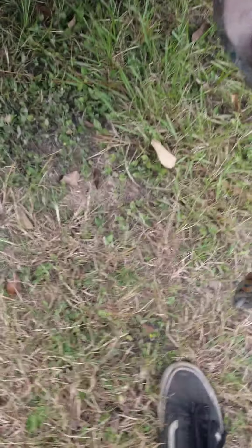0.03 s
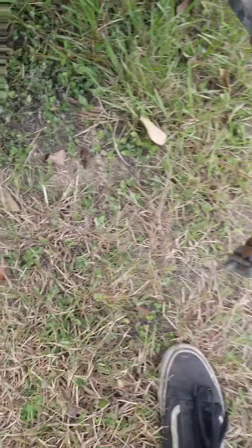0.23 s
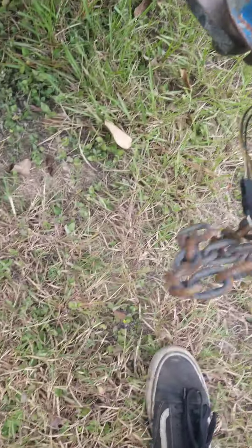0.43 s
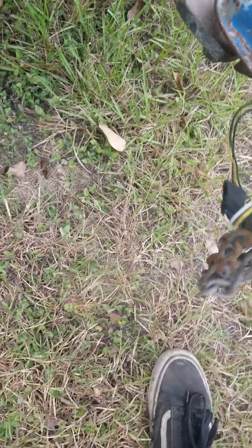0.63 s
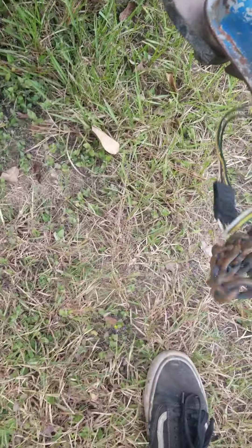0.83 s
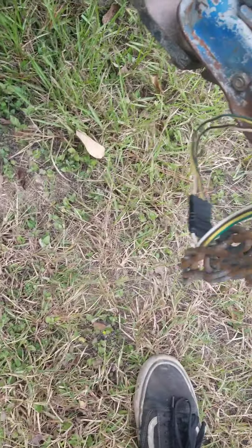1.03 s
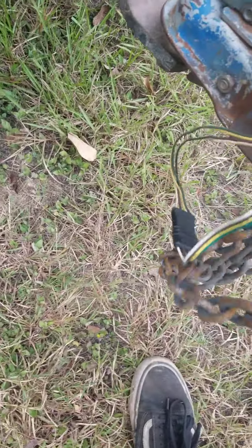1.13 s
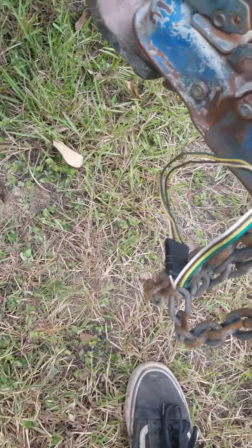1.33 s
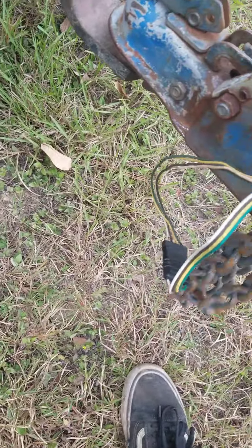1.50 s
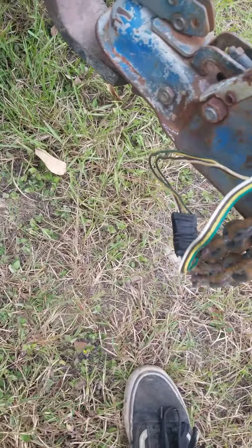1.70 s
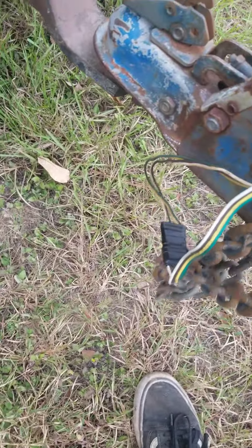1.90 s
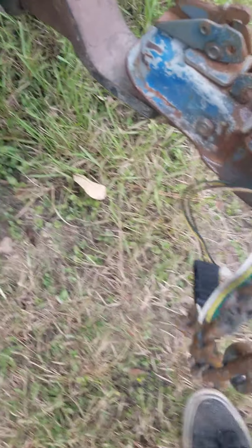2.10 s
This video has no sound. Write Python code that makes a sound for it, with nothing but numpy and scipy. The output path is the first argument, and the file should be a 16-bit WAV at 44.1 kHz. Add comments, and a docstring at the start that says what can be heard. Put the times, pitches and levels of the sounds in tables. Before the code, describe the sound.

A rusty steel chain clinks and rattles close by, knocking against a trailer hitch outdoors.

```python
"""High ticks and rings of a rusty steel chain, handled close by at a trailer hitch, outdoors over grass.
Links tick and ring as they collide, and scrape as they slide. Heavier steel parts clack and ring
the hitch; moving the chain gives two soft thumps. Behind it: faint wind rumble, low hum, airy hiss."""
import sys
import numpy as np
from scipy import signal
from scipy.fft import rfft, irfft, next_fast_len
from scipy.io import wavfile
from scipy.ndimage import map_coordinates

SR = 44100
rng = np.random.default_rng(int(sys.argv[2]) if len(sys.argv) > 2 else 0)


def transcribe(u):
    """Save the signal u as a 16-bit wav file named by the first command-line argument.

    u: samples, shape (n,) or (channels, n), limited to [-1, 1]; the rate is SR.
    q: integer samples, one column per channel.
    """
    v = np.clip(np.atleast_2d(u).T, -1, 1)
    q = np.round(v * 32767).astype(np.int16)
    wavfile.write(sys.argv[1], SR, q)


N = 94815
T = np.arange(SR // 2) / SR  # time within one event, s

# Table levels are relative, ahead of each layer's gain.
# link striking link: start_s, tick_db, ring_db
LINK_HITS = [(0.142, -40.5, -36), (.163, -40, -35), (.2319, -26.5, -8.5), (0.251, -20.5, -7),
             (0.2754, -27.5, -8), (0.3596, -27.5, -3.5), (0.4184, -17.5, -29), (.458, -30, -9.5),
             (.523, -26.5, -5), (.538, -26, -16.5), (0.5533, -29, -6.5), (0.564, -23, -1), (.58, -28, -9.5),
             (0.608, -21, -3.5), (.616, -34, -13), (.63, -23.5, -5.5), (.647, -24.5, -2.5),
             (0.663, -42.5, -5), (0.694, -38, -9.5), (0.7301, -36.5, -9), (.739, -35.5, -15),
             (0.7849, -33.5, -17), (0.794, -33.5, -25.5), (.832, -36, -20.5), (0.9051, -30, -4.5),
             (.921, -29, -4), (0.948, -40.5, -20), (.951, -27, -2), (0.966, -34, -6.5), (0.984, -41, -29),
             (.996, -43, -19), (1.015, -35, -12), (1.069, -47, -24.5), (1.094, -41.5, -41),
             (1.1438, -41.5, -24), (1.1793, -41, -34), (1.2404, -43, -41.5), (1.326, -44, -49),
             (1.415, -49, -41), (1.5232, -43, -51.5), (1.5437, -34.5, -43), (1.898, -43, -22),
             (1.949, -48.5, -31), (2.0493, -44.5, -31)]
# free ringing of the links: pitch_hz, level_db
LINK_RING_MODES = [(13322, 3), (13450, 1.5), (13730, 2), (13930, -6), (14291, 5.5), (14517, -1),
                   (14735, -13), (15100, -7.5)]
# links ring longer when the chain hangs slack: time_s, t60_s
LINK_DECAY = [(.26, 0.023), (.52, 0.039), (.63, 0.097), (1.2, 0.052)]
# single modes left by a clean strike: start_s, pitch_hz, level_db, t60_s
LINK_PINGS = [(.006, 2670, -33, .09), (0.145, 9125, -50, 0.2), (.36, 12200, -14, 0.044),
              (0.363, 11740, -21, 0.074), (0.418, 6360, -13, 0.02), (.419, 4410, -31.5, 0.052),
              (0.61, 14200, -16.5, 0.23), (.696, 13322, -13, 0.13), (0.758, 9125, -41, 0.048),
              (0.904, 12160, -15, 0.062), (.955, 11700, -17.5, 0.052), (1.094, 12060, -26, 0.036),
              (1.726, 3600, -48, .1), (1.956, 3470, -46, 0.11)]
# link contact spectrum: freq_hz, level_db
TICK_SPECTRUM = [(200, -43), (900, -20), (1800, -7), (3200, -1.5), (5500, -1), (7000, 1), (8500, -11),
                 (10500, 1), (13000, 2), (15000, 1.5), (16200, -10)]
# rusty links sliding: time_s, level_db
SCRAPE_LEVEL = [(.13, -57), (.17, -47), (.2, -51), (.33, -45.5), (.58, -35.5), (.7, -45), (.82, -39.5),
                (.86, -55.5), (.98, -34), (1.05, -63.5), (1.51, -60), (1.565, -35), (1.6, -64),
                (1.73, -53.5), (1.78, -73), (2.03, -59.5), (2.13, -46)]
# heavy steel knocking on the hitch: start_s, level_db, t60_s, body_offset_db
HITCH_CLACKS = [(.006, -32.5, 0.096, 9.5), (0.0877, -10.5, 0.035, -18), (.248, -4, 0.018, -1),
                (0.251, -26.5, 0.1, 19), (.35, -18, 0.036, 7), (0.42, -22, 0.17, 9), (.458, -21, 0.083, 6),
                (.505, -27.5, 0.17, 6.5), (.667, -10, 0.048, 0.5), (0.806, -22, 0.042, 0.5),
                (1.617, -13.5, 0.053, 1), (1.726, -30, 0.1, -2), (1.956, -37, 0.12, 2.5)]
# clack spectrum, stereo mid: freq_hz, level_db
CLACK_MID_SPECTRUM = [(200, -51), (1000, -22.5), (2200, -15.5), (2800, -2.5), (3600, -4.5), (4600, -8.5),
                      (6000, -20.5), (9000, -38)]
# clack spectrum, stereo side: freq_hz, level_db
CLACK_SIDE_SPECTRUM = [(900, -46.5), (2200, -19.5), (2550, 9), (3000, -4.5), (3800, -6.5), (4600, -9.5),
                       (6000, -21), (9000, -38)]
# hitch body response: freq_hz, level_db
BODY_SPECTRUM = [(200, -18), (1000, -7.5), (1500, 1), (1980, 9), (2300, -6.5), (5000, -48)]
# hitch steel rung by each clack: pitch_hz, level_db, t60_s
CLACK_MODES = [(1463, -29.5, 0.12), (1917, -25.5, 0.13), (2120, -32, 0.12), (2560, -22.5, 0.065),
               (3200, -25, 0.054), (4314, -27.5, 0.12)]
# blows square on the hitch: start_s, level_db
SQUARE_HITS = [(.248, -43.5), (.664, -44.5)]
# hitch ringing after a square blow: pitch_hz, level_db, t60_s
SQUARE_HIT_MODES = [(727, -3.5, 0.91), (1915, 4, .2)]
# soft thumps: start_s, level_db
CHAIN_THUMPS = [(0.249, -37.5), (0.498, -29.5)]
# envelope of wind and hum: time_s, level_db
WIND_LEVEL = [(0.0, -38.5), (1.41, -51.5), (2.15, -47.5)]
# wind rumble: freq_hz, level_db
WIND_SPECTRUM = [(20, -30), (70, 0.5), (97, -7.5), (200, -5.5), (300, -12.5), (550, -29.5), (1300, -71.5)]
# low hum: pitch_hz, level_db
HUM_PARTIALS = [(73, -7.5), (122, -10), (147, -15.5), (193, -15.5)]
# open-air hiss envelope: time_s, level_db
AIR_LEVEL = [(0, -43.5), (.6, -46.5), (1.1, -57.5), (2.15, -53)]
# open-air hiss: freq_hz, level_db
AIR_SPECTRUM = [(150, -9.5), (450, 4.5), (800, 3), (3000, -7), (6000, -13.5), (9000, -39.5)]

TICK_T60_S, TICK_TAIL_DB, TICK_TAIL_T60_S = 0.02, -3, 0.046
TICK_RING_LOW_HZ, TICK_RING_HIGH_HZ, TICK_RING_DB, TICK_RING_T60_S = 4400, 7300, -3, 0.025
TICK_DIFFUSE_DB, LEFT_LEAD_S = 2, 0.0002
RING_PAN_DB, TICK_PAN_DB = -6.5, -0.5  # left minus right
LINK_DETUNE_RATIO, LINK_SCATTER_DB, LINK_WIDTH_HZ = 0.004, 4, 7
RING_ATTACK_S, CHOKE_EXPONENT, LINGER_DB, LINGER_T60_S = 0.00017, 1.25, -15.5, 0.18
GRIT_PER_S, GRIT_SPREAD_DB, SHIMMER_DB, SHIMMER_T60_S = 500, 5, -3, 0.048
CLACK_TAIL_DB, CLACK_TAIL_T60_S, STEEL_SCATTER_DB = -22, 0.14, 2
THUMP_HZ, THUMP_T60_S = 73, 0.21
YARD_DB, YARD_T60_S = -24, 0.54
TOP_HZ = 16100


def links():
    """Each collision ticks and rings a fresh mix of link modes until the neighbours choke them."""
    ticks, rings = np.zeros((2, 2, N))
    rise = 1 - np.exp(-T / RING_ATTACK_S)
    for start_s, tick_db, ring_db in LINK_HITS:
        direct = amp(tick_db) * tick()
        add(ticks[0], start_s, direct)
        add(ticks[1], start_s + LEFT_LEAD_S, direct)
        diffuse = burst(TICK_T60_S, TICK_TAIL_DB, TICK_TAIL_T60_S)
        add(ticks, start_s, amp(tick_db + TICK_DIFFUSE_DB) * diffuse)
        ring = 0
        for hz, db in LINK_RING_MODES:
            gain = amp(db + LINK_SCATTER_DB * rng.normal())
            ring += gain * link_tone(hz * (1 + LINK_DETUNE_RATIO * rng.normal()))
        t60_s = np.interp(start_s, *np.transpose(LINK_DECAY))
        choked = amp(-60 * (T / t60_s) ** CHOKE_EXPONENT)
        decay = choked + amp(LINGER_DB) * fade(LINGER_T60_S)
        add(rings, start_s, amp(ring_db - 10.5) * unit(ring) * rise * decay)
    for start_s, hz, db, t60_s in LINK_PINGS:
        add(rings, start_s, amp(db) * link_tone(hz) * rise * fade(t60_s))
    return amp(-0.5) * pan(TICK_PAN_DB) * colour(ticks, TICK_SPECTRUM) + pan(RING_PAN_DB) * rings


def tick(mode_count=4):
    """Hard contact: a crack plus brief resonances that differ from link to link."""
    pitches_hz = rng.uniform(TICK_RING_LOW_HZ, TICK_RING_HIGH_HZ, mode_count)
    ring = unit(sum(tone(hz)[0] for hz in pitches_hz))
    crack = rng.standard_normal(len(T)) * fade(TICK_T60_S)
    return crack + amp(TICK_RING_DB) * ring * fade(TICK_RING_T60_S)


def link_tone(hz):
    """One link mode, blurred by chatter against its neighbours."""
    step_rad = np.sqrt(2 * np.pi * LINK_WIDTH_HZ / SR)
    drift_rad = step_rad * np.cumsum(rng.standard_normal((2, len(T))), axis=1)
    return np.sqrt(2) * np.sin(2 * np.pi * (hz * T + rng.random((2, 1))) + drift_rad)


def scrape():
    """Rust grinds in tiny grains between sliding links and keeps their modes shimmering."""
    noise = rng.standard_normal((2, N))
    grain_db = GRIT_SPREAD_DB * wobble(GRIT_PER_S) + 2.7 * wobble(70)
    grit = level(SCRAPE_LEVEL) * unit(noise * amp(grain_db))
    ring = sum(amp(db) * link_tone(hz) for hz, db in LINK_RING_MODES) * fade(SHIMMER_T60_S)
    return colour(grit, TICK_SPECTRUM) + amp(SHIMMER_DB) * pan(RING_PAN_DB) * excite(ring, grit)


def hitch():
    """Heavy contacts clack and ring the steel; firm ones sound the body, square ones ring on."""
    blows, body, rings = np.zeros((3, 2, N))
    for start_s, db, t60_s, body_db in HITCH_CLACKS:
        clack = burst(t60_s, CLACK_TAIL_DB, CLACK_TAIL_T60_S)
        clack[:, 0] += amp(19)  # first touch
        add(blows, start_s, amp(db) * clack)
        add(body, start_s, amp(db + body_db) * clack)
        for hz, mode_db, mode_t60_s in CLACK_MODES:
            ring_db = db + body_db / 2 + mode_db + STEEL_SCATTER_DB * rng.normal()
            add(rings, start_s, amp(ring_db) * tone(hz) * fade(mode_t60_s))
    for start_s, db in SQUARE_HITS:
        for hz, mode_db, t60_s in SQUARE_HIT_MODES:
            add(rings, start_s, amp(db + mode_db) * tone(hz) * fade(t60_s))
    mid = amp(-12) * colour(blows[0], CLACK_MID_SPECTRUM)
    side = amp(-7) * colour(blows[1], CLACK_SIDE_SPECTRUM)
    resonance = amp(-19) * colour(body, BODY_SPECTRUM) + rings
    return np.array([mid + side, mid - side]) + pan(6.3) * resonance


def thumps():
    """Soft low thumps as the chain is moved."""
    track = np.zeros(N)
    for start_s, db in CHAIN_THUMPS:
        add(track, start_s, amp(db) * np.sin(2 * np.pi * THUMP_HZ * T) * fade(THUMP_T60_S))
    return track


def yard(x):
    """Faint, dull scatter from the surroundings."""
    tail = rng.standard_normal((2, len(T))) * fade(YARD_T60_S)
    return amp(YARD_DB) * colour(excite(tail, x), [(3000, 5.5), (14000, -3)])


def wind_and_hum():
    """Wind rumble and a wavering low hum under one envelope."""
    hum = 0
    for hz, db in HUM_PARTIALS:
        gain = amp(db + 5.07 * wobble(5.69))
        drift_rad = 0.47 * wobble(5.97)
        hum += gain * np.sin(2 * np.pi * hz * np.arange(N) / SR + drift_rad)
    rumble = rush(WIND_SPECTRUM, side_db=-17)
    return level(WIND_LEVEL) * (amp(1) * rumble + amp(4.5) * hum)


def air():
    """Wide hiss of open air."""
    return level(AIR_LEVEL) * rush(AIR_SPECTRUM, side_db=-1)


def burst(t60_s, tail_db, tail_t60_s):
    """Dense, quickly damped contact vibration with a weaker tail."""
    return rng.standard_normal((2, len(T))) * (fade(t60_s) + amp(tail_db) * fade(tail_t60_s))


def tone(hz):
    """One mode, left and right somewhat out of phase."""
    return np.sqrt(2) * np.sin(2 * np.pi * (hz * T + rng.random()) + rng.standard_normal((2, 1)))


def rush(spectrum, side_db):
    """Stereo noise, rms 1."""
    mid, side = colour(rng.standard_normal((2, N)), spectrum)
    return unit(np.array([mid + amp(side_db) * side, mid - amp(side_db) * side]))


def excite(response, x):
    """Convolve x with an energy-normalised impulse response."""
    return signal.fftconvolve(x, response / np.linalg.norm(response[0]), axes=1)[:, :N]


def colour(x, spectrum):
    """Minimum-phase, unit-power filter through (freq_hz, level_db) points."""
    size = 2 * next_fast_len(N)
    hz, db = np.transpose(spectrum)
    bins_hz = np.fft.rfftfreq(size, 1 / SR)
    gain = unit(amp(np.interp(np.log(bins_hz + 1), np.log(hz + 1), db)))
    cepstrum = irfft(np.log(gain + 1e-6))
    cepstrum[1:size // 2] *= 2
    cepstrum[size // 2 + 1:] = 0
    return irfft(rfft(x, size) * np.exp(rfft(cepstrum)), size)[..., :N]


def amp(db):
    """Decibels to gain."""
    return 10 ** (np.asarray(db) / 20)


def unit(x):
    """Scale to rms 1."""
    return x / np.sqrt(np.mean(x ** 2) + 1e-20)


def fade(t60_s):
    """Exponential decay."""
    return amp(-60 * T / t60_s)


def level(points):
    """Gain per sample from (time_s, level_db) points."""
    return amp(np.interp(np.arange(N) / SR, *np.transpose(points)))


def wobble(knots_per_s):
    """Smooth random curve."""
    knots = rng.standard_normal(int(N * knots_per_s / SR) + 4)
    return map_coordinates(knots, [np.arange(N) * knots_per_s / SR])


def pan(db):
    """Stereo gains, left minus right = db."""
    return amp([[db / 2], [-db / 2]])


def add(track, start_s, sound):
    """Mix a sound in at start_s."""
    i = round(start_s * SR)
    track[..., i:i + sound.shape[-1]] += sound[..., :N - i]


def scene():
    """Chain and hitch close by, over the background."""
    steel = links() + scrape() + hitch()
    return steel + yard(steel) + thumps() + wind_and_hum() + air()


def record(dry):
    """Clip at full scale, then cut above TOP_HZ."""
    size = next_fast_len(N + SR // 2)
    passband = np.fft.rfftfreq(size, 1 / SR) < TOP_HZ
    return irfft(rfft(np.clip(dry, -1, 1), size) * passband, size)[:, :N]


dry = scene()
out = record(dry)
transcribe(out)
```